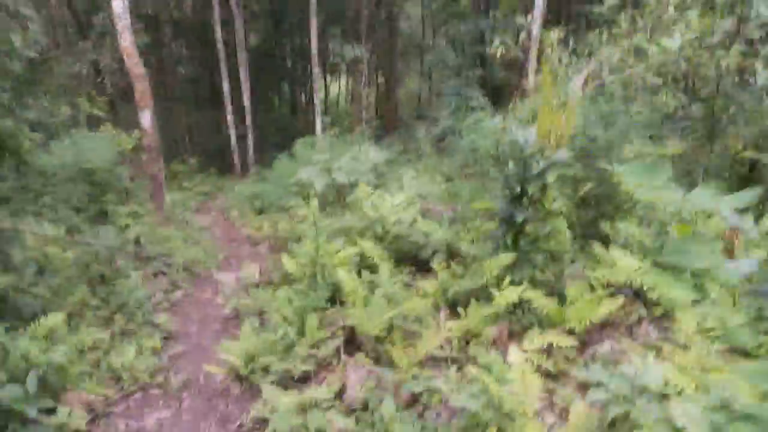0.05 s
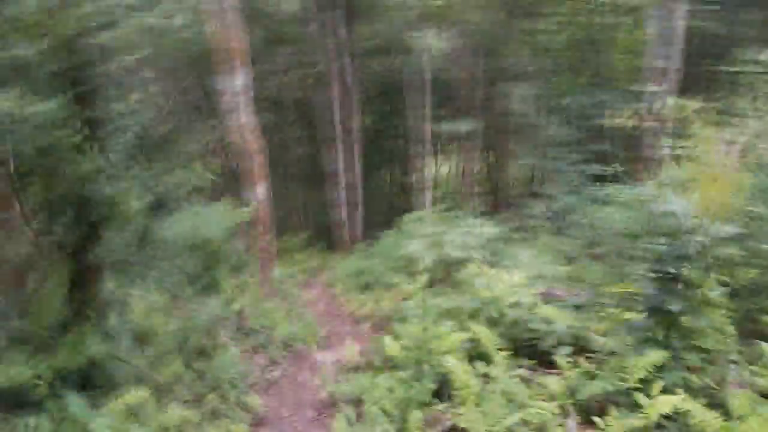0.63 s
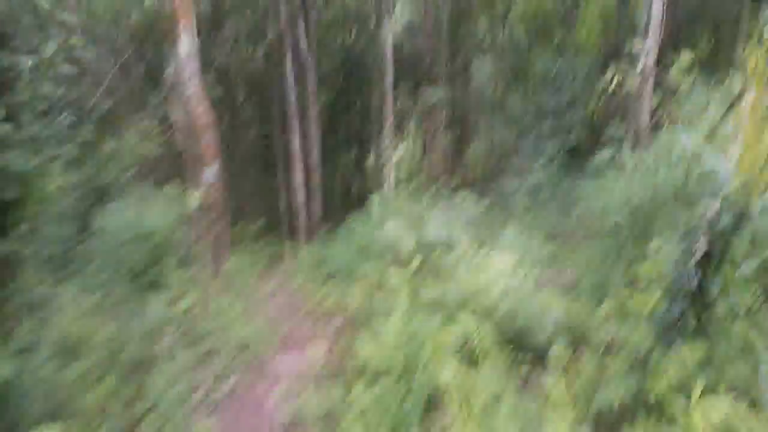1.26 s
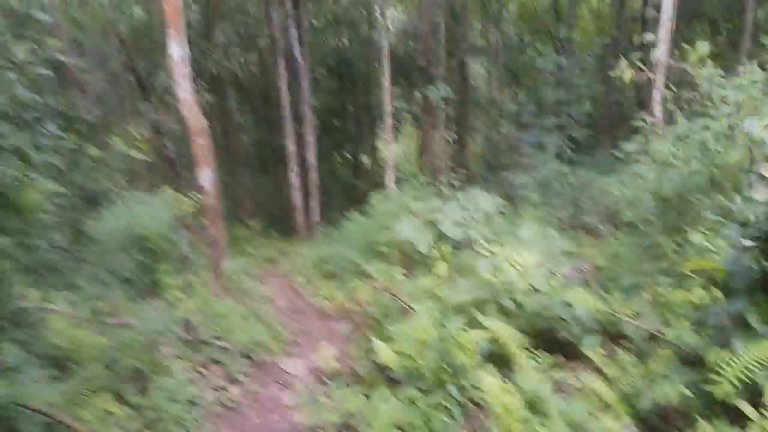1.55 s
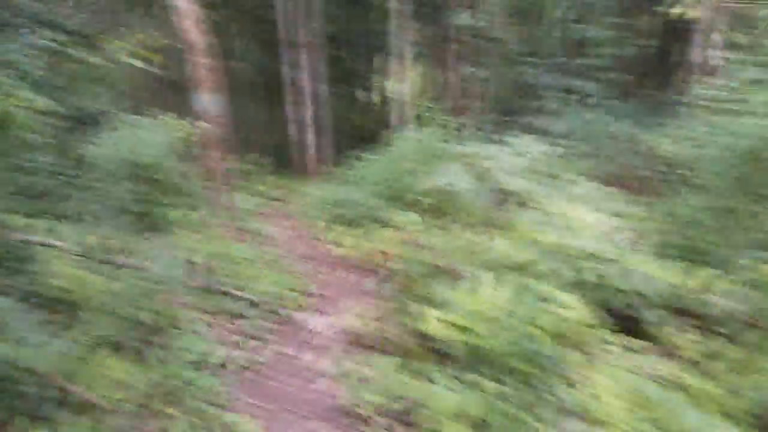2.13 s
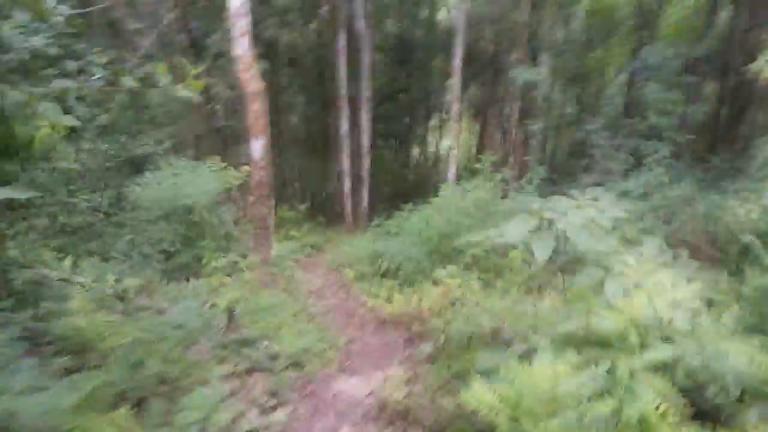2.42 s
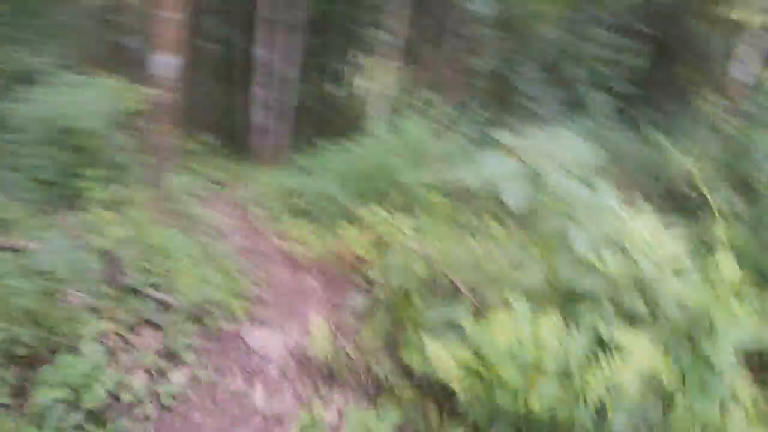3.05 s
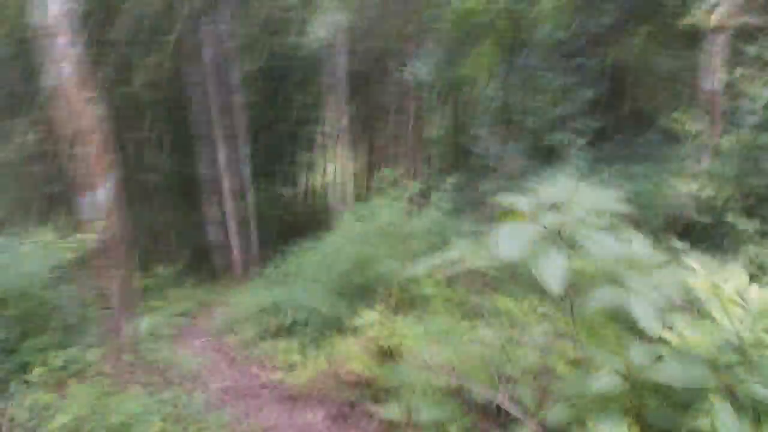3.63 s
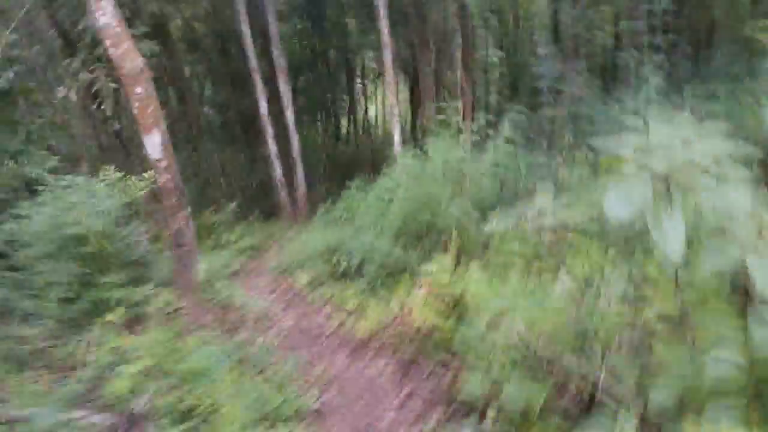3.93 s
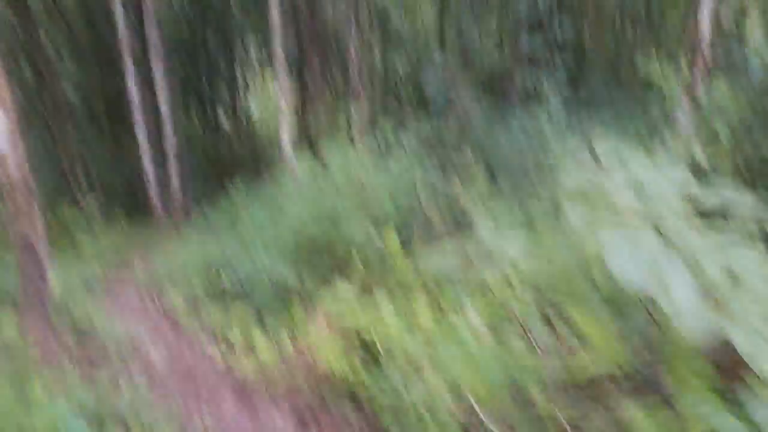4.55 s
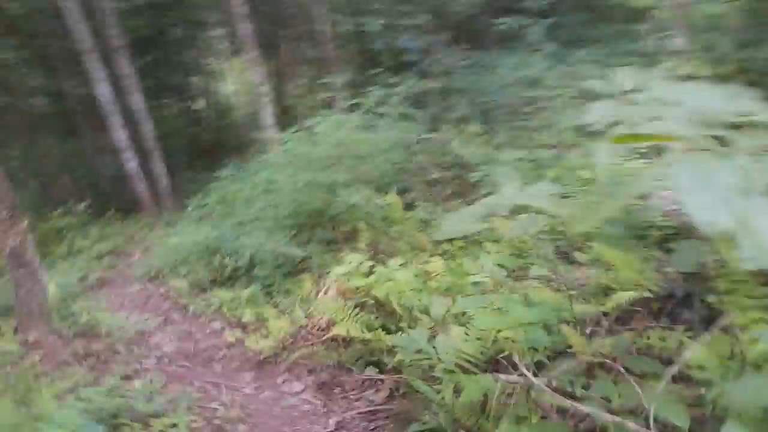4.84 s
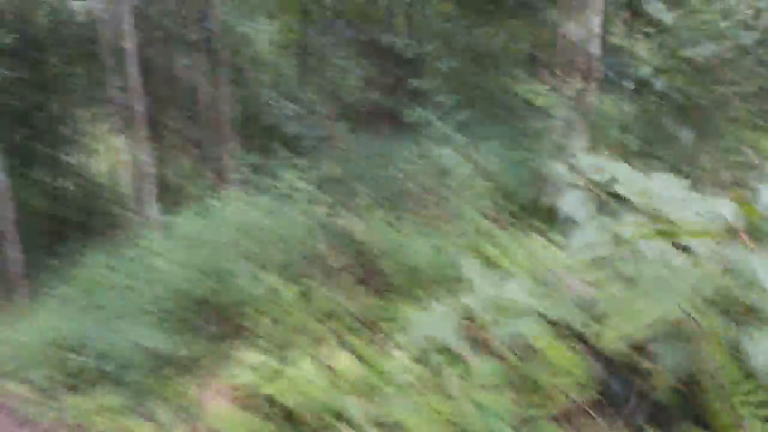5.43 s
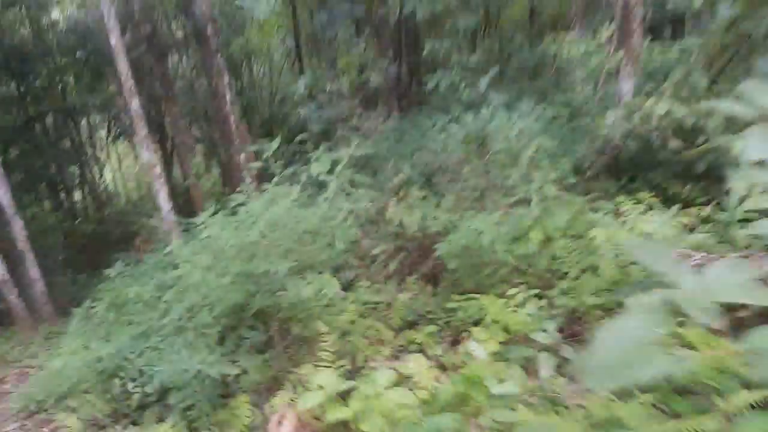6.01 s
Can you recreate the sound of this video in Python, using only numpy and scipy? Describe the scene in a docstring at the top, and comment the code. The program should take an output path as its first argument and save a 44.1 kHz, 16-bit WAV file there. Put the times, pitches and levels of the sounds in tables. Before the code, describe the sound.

Someone walks briskly along a dirt path in a forest, carrying the microphone. Shoes thud and scuff about twice a second, crunching dry leaves and twigs, while loose gear knocks and ferns and nylon clothing swish. Low puffs of wind buffet the right side of the microphone, strongest in the first half. Behind the steps, insects shrill faintly on one high pulsing note over the quiet hush of the trees.

```python
"""A dirt path through forest undergrowth, where someone walks briskly, carrying the microphone.
Shoes thud and loose gear knocks as damped resonators; dry litter crunches by brittle fracture.
Ferns and nylon clothing swish by friction, and each stride drives turbulent air over the right port.
Insects shrill on one pulsing note above the hush of the trees. Faint hollow tones swell and fade."""
import sys
import numpy as np
from scipy import signal
from scipy.fft import rfft, irfft, next_fast_len
from scipy.io import wavfile

SR = 44100
rng = np.random.default_rng(int(sys.argv[2]) if len(sys.argv) > 2 else 0)


def generate_wav(sig):
    """Save sig (samples, or channels by samples) to the path in sys.argv[1] as 16-bit PCM at SR."""
    pcm = np.round(np.clip(np.atleast_2d(sig).T, -1, 1) * 32767).astype(np.int16)
    wavfile.write(sys.argv[1], SR, pcm)


N = 276771
TIME = np.arange(N) / SR
FFT_SIZE = next_fast_len(N, True)
HZ = np.maximum(np.arange(FFT_SIZE // 2 + 1) * SR / FFT_SIZE, 1)
SIDES = np.array([[1], [-1]])   # left, right


def from_db(db):
    """Amplitude ratio of a level in decibels."""
    return 10 ** (np.asarray(db) / 20)


def unit_rms(x):
    """Normalisation to a mean power of 1."""
    return x / np.sqrt(np.mean(x ** 2) + 1e-20)


def at_hz(rows, hz):
    """Interpolation of each column of a spectrum along a logarithmic frequency axis."""
    points, *columns = np.transpose(rows)
    return [np.interp(np.log(hz), np.log(points), column) for column in columns]


def add(out, start_s, sound):
    """Superposition of a short sound on a longer one."""
    start = max(round(start_s * SR), 0)
    out[..., start:start + sound.shape[-1]] += sound[..., :max(N - start, 0)]


def drift(per_s):
    """Random modulation, gliding to a new value per_s times a second; rms 1."""
    return unit_rms(np.interp(TIME * per_s, np.arange(N // 8), rng.standard_normal(N // 8)))


def phrase(start_s, end_s, fade_s=0.025):
    """Amplitude envelope with a smooth onset and release."""
    return (np.tanh((TIME - start_s) / fade_s) - np.tanh((TIME - end_s) / fade_s)) / 2


def band(spectra, low_hz, high_hz):
    """Band-pass filtering of two spectra into a stereo signal; rms 1."""
    gain = 1 / np.sqrt((1 + (low_hz / HZ) ** 10) * (1 + (HZ / high_hz) ** 10))
    return unit_rms(irfft(spectra * gain, FFT_SIZE)[:, :N])


def narrow_noise(hz, width_hz):
    """Random quadrature modulation spreads a tone into a narrow band; rms 1."""
    position = np.arange(len(hz)) * width_hz / SR
    knots = rng.standard_normal((2, N // 8))
    in_phase, quadrature = [np.interp(position, np.arange(N // 8), row) for row in knots]
    phase = 2 * np.pi * np.cumsum(hz) / SR
    return unit_rms(in_phase * np.cos(phase) + quadrature * np.sin(phase))


def grains(per_s, spread_db, hiss):
    """Shot noise in two rows: many weak snaps and a few strong ones, in a smooth friction hiss."""
    onsets = rng.random(N) < per_s / SR
    sizes = from_db(spread_db * np.minimum(rng.exponential(1, N), 5))
    snaps = unit_rms(onsets * sizes * rng.standard_normal((2, N)))
    return snaps + hiss * rng.standard_normal((2, N))


# The sound field at the two microphone ports: frequency_hz, left_minus_right_db, correlation
PORT_FIELD = [(102, -2, 1), (414, 0, 0.81), (830, -0.5, 0.54), (1350, -3, 0.12), (2300, -7.5, -0.08),
              (5470, -11, -0.083), (7400, -1, 0.41), (12100, -2.5, -0.16), (16000, -3.5, 0.0083)]
def at_ports(pair, colour):
    """Partial coherence: the ports' spectra agree in the bass; the treble differs and leans right."""
    balance_db, correlation = at_hz(PORT_FIELD, HZ)
    correlation = np.clip(correlation, -.98, .98)
    mid, side = rfft(pair, FFT_SIZE)
    spectra = np.sqrt(1 + correlation) * mid + SIDES * np.sqrt(1 - correlation) * side
    mean_power = np.cosh(balance_db * np.log(10) / 20)
    return spectra * from_db(SIDES * balance_db / 2 + at_hz(colour, HZ)[0]) / np.sqrt(mean_power)


# Spectrum of the ambient noise among the trees: frequency_hz, relative_density_db
HUSH_SPECTRUM = [(25, 21.5), (80, 5), (200, -3.5), (400, -5.5), (800, -12), (1130, -12.5), (1260, -7),
                 (1400, -19), (2400, -11.5), (3500, -23), (5000, -16.5), (6300, -45), (9000, -60),
                 (16000, -19)]
def forest_hush(level_db=-60):
    """Stationary coloured noise forms the floor of the scene."""
    return from_db(level_db) * band(at_ports(rng.standard_normal((2, N)), HUSH_SPECTRUM), 46, 17000)


# Faint hollow, breathy tones that swell and fade: start_s, end_s, pitch_hz, level_db
HOLLOW_TONES = [(1.15, 1.4, 1250, -70), (2.15, 2.3, 1260, -67), (3.3, 3.65, 1260, -67.5),
                (1.12, 1.38, 2000, -78), (3.94, 4.6, 2380, -70)]
def hollow_tones(relative_bandwidth=.13):
    """Narrow-band noise is heard as a hollow, breathy pitch."""
    out = np.zeros((2, N))
    for start_s, end_s, pitch_hz, level_db in HOLLOW_TONES:
        tone = np.array([narrow_noise(np.full(N, pitch_hz), relative_bandwidth * pitch_hz) for _ in out])
        out += from_db(level_db) * phrase(start_s, end_s) * tone
    return out


# Phrases of the nearest insect: start_s, end_s, level_db (about which the pulses swing)
INSECT_PHRASES = [(0, 0.456, -60), (.93, 1.39, -64), (1.7, 2.2, -64), (2.42, 2.62, -67), (2.86, 3.05, -62),
                  (3.54, 3.932, -73), (4.24, 4.38, -64.5), (4.846, 5.012, -67), (5.538, 5.622, -63),
                  (5.947, 6.28, -68)]
def insects(pitch_hz=6973, jitter=.016, pulses_per_s=48, throb_db=4, chorus_db=-72.5):
    """Amplitude and frequency modulation roughen one shrill note, shared by near and distant insects."""
    hz = pitch_hz * (1 + jitter * np.array([drift(600), drift(600)]))
    carrier = np.sqrt(2) * np.sin(2 * np.pi * np.cumsum(hz, axis=1) / SR)
    pulse_hz = pulses_per_s * (1 + .25 * drift(20))
    pulses = np.sin(2 * np.pi * np.cumsum(pulse_hz) / SR)
    nearest = sum(from_db(db) * phrase(start_s, end_s) for start_s, end_s, db in INSECT_PHRASES)
    return np.hypot(nearest, from_db(chorus_db)) * from_db(throb_db * pulses) * carrier


# Gusts and lulls of air rumbling over the port: time_s, relative_level_db
GUSTS_AND_LULLS = [(0, -59), (.33, -59), (.62, -45), (.97, -54), (1.08, -73), (1.22, -37), (1.62, -45),
                   (1.85, -48), (2.3, -37), (2.58, -33), (2.72, -56.5), (3.1, -43.5), (3.48, -68.5),
                   (3.7, -46.5), (4.2, -50.5), (4.45, -76), (4.75, -41.5), (5.04, -62), (5.35, -45),
                   (5.54, -60.5), (5.8, -40), (6.28, -50)]
# Spectrum of the turbulence: frequency_hz, relative_density_db
TURBULENCE_SPECTRUM = [(15, 2.5), (30, -15), (50, 2), (70, 2.5), (100, 3.5), (150, -12), (250, -19.5),
                       (500, -66)]
# Single strong eddies at the right port: time_s, envelope_peak_db, pitch_hz
EDDIES = [(0.546, -22, 110), (0.579, -24.5, 100), (.662, -18.5, 108), (.756, -28.5, 86),
          (0.916, -19.5, 100), (0.995, -22, 74), (1.325, -22, 115), (1.358, -19.5, 86.5), (1.395, -17, 169),
          (1.455, -10.5, 121), (1.926, -17, 99), (2.054, -21, 85), (2.105, -22.5, 75), (2.268, -22.5, 129),
          (2.352, -24, 75.5), (2.471, -14.5, 150), (2.527, -19, 78), (2.553, -19, 122), (2.618, -12.5, 145),
          (3.069, -29, 70), (3.703, -27.5, 117), (3.922, -26, 82.5), (4.14, -29, 160), (4.599, -24, 104),
          (4.68, -32, 75), (4.815, -25, 88), (5.345, -26, 138), (5.855, -29, 110), (5.924, -27, 75),
          (6.238, -23.5, 92)]
def port_wind(gain_db=2.5, stride_db=2, lumpy_db=6, eddy_cycles=0.29, shelter_db=-16, leak_db=-34):
    """Turbulent pressure fluctuations buffet the right port; the left one lies sheltered."""
    gust_db = np.interp(TIME, *np.transpose(GUSTS_AND_LULLS)) + gain_db
    envelope = from_db(gust_db + stride_db * stride() + lumpy_db * drift(30))
    spectra = rfft(rng.standard_normal((2, N)), FFT_SIZE) * from_db(at_hz(TURBULENCE_SPECTRUM, HZ)[0])
    left, right = envelope * unit_rms(irfft(spectra, FFT_SIZE)[:, :N])
    t = np.arange(-(SR // 25), SR // 25) / SR
    for time_s, peak_db, pitch_hz in EDDIES:
        cycles = pitch_hz * t - 0.044 * (pitch_hz * t) ** 2   # the eddy slows as it leaves
        puff = from_db(peak_db) * np.exp(-.5 * (pitch_hz * t / eddy_cycles) ** 2)
        add(right, time_s + t[0], puff * np.sin(2 * np.pi * (cycles + rng.random())))
    return np.array([from_db(shelter_db) * left + from_db(leak_db) * right, right])


# Ribbed nylon sliding on itself: start_s, end_s, start_hz, middle_hz, end_hz, level_db, width_hz
NYLON_SLIDES = [(0, 0.146, 10300, 9300, 9100, -65, 200), (0.535, 0.665, 5900, 5680, 5200, -53.5, 650),
                (0.56, 0.87, 5650, 5550, 5450, -61.5, 750), (4.195, 4.305, 10700, 12050, 8300, -59.5, 450),
                (4.13, 4.32, 10900, 11700, 10600, -59.5, 2200),
                (4.285, 4.395, 12700, 11500, 9000, -69, 300), (4.28, 4.37, 11200, 10600, 9400, -69, 300),
                (4.79, 4.98, 11100, 11500, 10700, -63, 3200), (5.455, 5.61, 9900, 10950, 10050, -66, 220),
                (5.68, 5.79, 10200, 10700, 9100, -65, 400), (5.63, 5.81, 11800, 13300, 10200, -74.5, 700),
                (5.92, 6.19, 11200, 11900, 10900, -54.5, 3000)]
def nylon_zips():
    """Periodic contact: ribs pass each other unevenly, at a rate that glides with the swing of a limb."""
    out = np.zeros((2, N))
    for start_s, end_s, start_hz, middle_hz, end_hz, level_db, width_hz in NYLON_SLIDES:
        progress = np.linspace(0, 1, round((end_s - start_s) * SR))
        glide_hz = np.polyval(np.polyfit([0, .5, 1], [start_hz, middle_hz, end_hz], 2), progress)
        envelope = from_db(level_db) * np.sqrt(2) * np.sin(np.pi * progress)
        add(out, start_s, envelope * np.array([narrow_noise(glide_hz, width_hz) for _ in out]))
    return out


# Spectrum of rubbing and snapping leaves, soil and cloth: frequency_hz, relative_density_db
CONTACT_SPECTRUM = [(150, 2.5), (400, -2), (720, -11.5), (950, -9), (1400, -8), (1750, -8), (2300, -5),
                    (3000, -9), (4800, -10), (6400, -17), (8500, -16), (11000, -12.5), (13000, -14.5),
                    (16000, -12)]
def foliage(dryness_db, patchy_db=3.5, leaf_sizes=7):
    """Spectral tilt: each size of leaf crackles in its own band, and dry leaves favour the high ones."""
    edges_hz = np.geomspace(700, 6500, leaf_sizes + 1)
    crackle, power = 0, 0
    for low, high, tilt in zip(edges_hz, edges_hz[1:], np.linspace(-1.01, 1.01, leaf_sizes)):
        snaps = band(at_ports(grains(per_s=1100, spread_db=2, hiss=0.64), CONTACT_SPECTRUM), low, high)
        density_db = at_hz(CONTACT_SPECTRUM, np.sqrt(low * high))[0] + tilt * dryness_db
        gain = from_db(density_db) * np.sqrt(high - low)
        crackle += gain * from_db(patchy_db * drift(75)) * snaps
        power += gain ** 2
    return crackle / np.sqrt(power)


def stroke_power(t, peak_db, rise_s, fall_s, shape=1.19):
    """Growth and decay of power about a peak at t = 0; shape 1 is pointed, 2 is rounded."""
    distance = np.abs(t / np.where(t < 0, rise_s, fall_s))
    return from_db(peak_db) ** 2 * np.exp(-2 * np.minimum(distance, 20) ** shape)


# Fronds and sleeves sweeping past, in relative levels:
# time_s, rise_s, fall_s, foliage_db, dryness_db, nylon_db
SWEEPS = [(.04, 0.39, 0.41, -52, 2.5, -54.5), (.235, 0.125, 0.084, -39.5, -5, -49),
          (.36, 0.024, 0.15, -47.5, 1.5, -53.5), (0.417, 0.014, 0.037, -39.5, -1.5, -44.5),
          (.67, 0.12, 0.027, -47.5, -5, -53), (1.0, 0.017, 0.03, -54, 3, -54.5),
          (1.17, 0.025, 0.032, -62, -1, -78), (1.33, 0.09, 0.11, -56.5, -8.5, -67),
          (1.55, 0.083, 0.087, -61, 9, -63), (1.81, 0.022, 0.026, -48, 9, -52.5),
          (2.031, 0.0089, 0.095, -51.5, 3, -54), (2.281, 0.029, 0.073, -51.5, -4.5, -58),
          (2.495, 0.048, 0.22, -49.5, -4.5, -58), (2.69, .03, 0.039, -72, 2, -66.5),
          (2.911, 0.015, 0.19, -46, 3.5, -51.5), (3.295, 0.024, 0.04, -44, -1, -59),
          (3.365, 0.051, 0.035, -47.5, 4, -51.5), (3.422, 0.0052, 0.026, -45.5, -3, -67),
          (3.56, 0.036, 0.055, -57.5, 13, -61.5), (4.25, 0.21, 0.085, -54, -0.5, -55.5),
          (4.4, 0.048, 0.031, -50.5, -1.5, -65), (4.725, 0.045, 0.049, -51, 4.5, -54.5),
          (4.85, 0.083, 0.3, -60, -1, -56.5), (5.155, 0.024, 0.078, -51, 8, -53),
          (5.32, 0.057, 0.11, -56, 0.5, -62), (5.47, 0.17, 0.089, -57, 2.5, -68),
          (5.634, 0.077, 0.089, -56.5, 0, -57.5), (5.78, 0.097, 0.038, -62.5, -9, -73.5),
          (6.06, 0.21, 0.081, -54, -0.5, -50.5), (6.22, 0.23, 0.47, -50.5, 3, -51.5)]
# Footfalls, in relative levels: time_s, rise_s, fall_s, scuff_db, foliage_db, dryness_db, nylon_db
FOOTFALLS = [(.55, 0.029, 0.15, -40.5, -47, -4, -53), (.915, 0.056, 0.072, -45, -49, -5.5, -64),
             (1.42, 0.038, 0.12, -46, -47, -4, -52.5), (1.897, 0.053, 0.047, -47.5, -44, 7, -46),
             (2.612, 0.058, 0.044, -39, -48.5, -2, -45), (3.11, 0.05, 0.21, -43, -50, 6, -55.5),
             (3.72, 0.13, 0.12, -49, -48.5, 5, -56.5), (4.095, 0.09, 0.22, -46.5, -55, 1, -56.5),
             (4.58, 0.03, 0.05, -41, -45, 1.5, -51.5), (5.213, 0.029, 0.042, -74, -47.5, 9, -50),
             (5.88, 0.023, 0.066, -37, -40.5, 3.5, -54)]
def stroke_levels(sweep_rub_db=0.5, rub_limit_db=-50):
    """Incoherent sources add in power: all strokes sum to scuff, foliage, dryness and nylon curves (dB)."""
    sweeps = [(time_s, rise_s, fall_s, min(leaf_db + sweep_rub_db, rub_limit_db), leaf_db, *rest)
              for time_s, rise_s, fall_s, leaf_db, *rest in SWEEPS]
    scuff, leaves, nylon = from_db([-64, -73, -80]) ** 2   # clothes never quite stop moving
    dryness, coarse_time = 0, TIME[::40]
    for time_s, rise_s, fall_s, scuff_db, leaf_db, dryness_db, nylon_db in list(FOOTFALLS) + sweeps:
        t = coarse_time - time_s
        touched = stroke_power(t, leaf_db, rise_s, fall_s)
        leaves += touched
        dryness += touched * dryness_db
        scuff += stroke_power(t, scuff_db, 1.25 * rise_s, 0.74 * fall_s)   # starts before the leaves
        nylon += stroke_power(t, nylon_db, 0.9 * rise_s, 1.07 * fall_s)   # keeps sliding after them
    curves = 10 * np.log10(scuff), 10 * np.log10(leaves), dryness / leaves, 10 * np.log10(nylon)
    return [np.interp(TIME, coarse_time, curve) for curve in curves]


def stride(lag_cycles=0.038):
    """The walker's bob is a quasi-periodic oscillation: 1 just after each footfall, -1 between two."""
    times = np.array(FOOTFALLS)[:, 0]
    period_s = np.diff(times).mean()
    times = np.r_[times[0] - period_s, times, times[-1] + period_s]
    cycles = np.interp(TIME, times, np.arange(len(times)))
    return np.cos(2 * np.pi * (cycles - lag_cycles))


def brushing(lumpy_db=4.5, flutter_db=1.13, tick_db=-13, flicks_per_s=28, flick_decay_s=0.0035):
    """Stick-slip friction: soles scuff the soil, leaves catch and slip, and nylon hisses above them."""
    scuff_db, leaf_db, dryness_db, nylon_db = stroke_levels()
    friction = at_ports(grains(per_s=3000, spread_db=2, hiss=1.07), CONTACT_SPECTRUM)
    catching_db = flutter_db * drift(170)
    scuff = from_db(scuff_db - 0.5 + lumpy_db * drift(90)) * band(friction, 106, 865)
    leaves = from_db(leaf_db - 0.5 + catching_db) * foliage(dryness_db)
    nylon = from_db(nylon_db - 1.06 + 0.99 * catching_db) * band(friction, 6900, 12700)
    onsets = rng.random(N) < flicks_per_s / SR   # stems flick the cloth at random
    flicks = unit_rms(signal.lfilter([1], [1, -np.exp(-1 / (SR * flick_decay_s))], onsets + 1e-18))
    ticks = from_db((leaf_db + nylon_db) / 2 + tick_db) * flicks * band(friction, 2300, 20000)
    return scuff + leaves + nylon + ticks


# Shoes and loose gear knocking: time_s, peak_db, pitch_hz, t60_s
IMPACTS = [(0.4077, -19.5, 383, 0.0075), (0.4092, -18.5, 1345, 0.022), (0.4098, -17, 1510, 0.013),
           (0.4105, -24.5, 2030, 0.013), (0.533, -24.5, 218, 0.0092), (.9287, -25.5, 520, 0.0052),
           (.929, -15.5, 1360, 0.001), (1.049, -39.5, 388, 0.03), (1.169, -38.5, 260, .025),
           (1.684, -42, 277, .03), (1.77, -35.5, 214, 0.035), (1.413, -25.5, 473, 0.0083),
           (1.4374, -28, 438, 0.01), (1.952, -27, 700, 0.0049), (2.2821, -22, 297, 0.011),
           (2.283, -29.5, 780, 0.033), (2.4795, -26.5, 337, 0.018), (2.5775, -16.5, 293, 0.015),
           (2.6009, -24, 332, 0.02), (2.969, -31, 343, 0.03), (3.044, -30.5, 274, 0.028),
           (3.071, -30.5, 440, 0.027), (3.0774, -26, 1410, 0.0069), (3.11, -30, 620, 0.0095),
           (3.1106, -26.5, 1220, 0.0099), (3.279, -32.5, 257, 0.021), (3.42, -22.5, 313, 0.019),
           (3.752, -23.5, 1290, 0.013), (4.027, -40, 409, 0.022), (4.069, -32, 390, 0.014),
           (4.085, -33.5, 378, 0.01), (4.179, -20.5, 734, 0.005), (4.21, -31, 500, 0.0041),
           (4.52, -35, 324, 0.01), (4.563, -27, 353, 0.017), (4.5888, -27.5, 313, 0.0076),
           (5.2544, -32.5, 290, 0.024), (5.2545, -27, 1480, 0.0023), (5.818, -39, 328, .025),
           (5.852, -32, 232, .025)]
def knocks(contact_cycles=0.27, rattle=0.21):
    """Damped free vibration: a soft contact sets a body ringing briefly and a little unevenly."""
    out, t = np.zeros((2, N)), np.arange(SR // 12) / SR
    for time_s, peak_db, pitch_hz, t60_s in IMPACTS:
        around_pitch = signal.butter(2, [pitch_hz / 2, pitch_hz * 2], "band", fs=SR, output="sos")
        noise = unit_rms(signal.sosfilt(around_pitch, rng.standard_normal(len(t))))
        envelope = (1 - np.exp(-t * pitch_hz / contact_cycles)) * from_db(-60 * t / t60_s)
        ring = envelope * (np.sin(2 * np.pi * pitch_hz * t) + rattle * noise)
        balance_db = at_hz(PORT_FIELD, pitch_hz)[0]
        add(out, time_s, from_db(peak_db + SIDES * balance_db / 2) * ring / np.abs(ring).max())
    return out


# Limits of the earth, twig, leaf and crisp bands: edge_hz
LITTER_EDGES = [150, 700, 2500, 7000, 17000]
# Dry litter and stems giving way: time_s, width_s, level_db, centre_hz, spread_octaves
FRACTURES = [(0.2075, 0.0089, -37, 1390, 0.37), (0.273, 0.019, -41, 6000, 1.4),
             (0.528, 0.0028, -31, 5000, 1.3), (0.536, 0.0027, -37.5, 3500, 1.5),
             (0.903, .0008, -34.5, 350, 1.9), (0.9433, 0.0011, -31.5, 3500, 3.9),
             (1.3493, 0.00057, -31, 230, 1.24), (1.401, 0.0033, -35.5, 1200, 1.6),
             (1.4147, 0.00054, -26.5, 1600, 1.4), (1.4387, 0.00064, -24, 8000, 4.1),
             (1.489, .0004, -51, 11000, 1.2), (1.782, 0.002, -42.5, 5000, 0.67),
             (1.9293, 0.0002, -25, 1080, 1.1), (1.9374, 0.0005, -34, 1290, 0.96),
             (1.954, 0.0015, -32, 450, 2.1), (2.0092, 0.00064, -33.5, 7500, 0.92),
             (2.5706, 0.0011, -35, 2200, 1.2), (2.604, 0.0014, -28.5, 420, 1.4),
             (2.914, 0.002, -31.5, 4700, 0.47), (2.9235, 0.00054, -38, 4500, 0.51),
             (2.94, 0.0046, -39, 4000, 0.37), (2.9693, 0.0011, -31, 450, 1.8),
             (3.016, 0.00064, -34, 4000, 0.46), (3.024, 0.00048, -32.5, 2900, .6),
             (3.081, 0.0012, -32, 250, 1.1), (3.1103, .0003, -27, 1990, 0.71),
             (3.112, 0.0022, -31.5, 1300, 0.86), (3.1574, 0.00038, -27, 2400, 1.2),
             (3.294, 0.00042, -38.5, 3000, 0.79), (3.406, .0016, -36, 10000, 0.52),
             (3.6804, 0.0022, -35, 900, 2.5), (3.7007, 0.0055, -38, 3040, 0.97),
             (3.7535, 0.001, -29, 2500, 1.4), (3.8127, 0.00045, -33, 2000, 0.58),
             (3.935, 0.00011, -34.5, 1510, 1.4), (4.085, 0.0083, -41, 500, 2.3),
             (4.566, 0.0014, -31.5, 2370, 0.91), (4.781, 0.00035, -41, 9000, 1.6),
             (4.823, .0004, -39.5, 13000, 0.99), (5.1183, 0.0023, -46, 9000, 1.03),
             (5.19, 0.0073, -43.5, 4200, .5), (5.2003, 0.00056, -31.5, 6000, 0.77),
             (5.229, 0.0008, -37, 9000, 1.8), (5.2564, 0.00036, -31, 800, 5.4),
             (5.874, 0.00066, -28, 4000, 2.1), (5.8838, 0.0022, -28.5, 1410, 1.1),
             (5.925, 0.00029, -36.5, 4500, 1), (6.075, 0.012, -42.5, 4170, 0.75),
             (6.157, 0.00054, -33.5, 3200, 0.6), (6.165, 0.013, -42, 3080, 0.63),
             (6.2256, 0.0033, -35.5, 7550, 0.57)]
def crunches(crumbs_db=-17, settle_s=0.013, splinter_db=-26, lead_s=.04):
    """Brittle fracture: each crunch is a dense burst of snaps, followed by settling crumbs."""
    t = np.arange(SR // 8) / SR - lead_s
    lows, highs = LITTER_EDGES[:-1], LITTER_EDGES[1:]
    middles_hz = np.sqrt(np.multiply(lows, highs))
    skew = np.where(t < 0, 0.83, 1.32)   # a burst rises faster than it falls
    crumbs = from_db(crumbs_db) ** 2 * (t > 0) * np.exp(-np.abs(t) / settle_s)
    band_power = np.zeros((4, N))
    for time_s, width_s, level_db, centre_hz, spread_octaves in FRACTURES:
        shares = np.exp(-.5 * (np.log2(middles_hz / centre_hz) / spread_octaves) ** 2)
        shares += from_db(splinter_db) ** 2   # splinters reach every band
        shares /= shares.sum()
        burst = np.exp(-.5 * (t / (width_s * skew)) ** 2)
        add(band_power, time_s - lead_s, from_db(level_db) ** 2 * shares[:, None] * (burst + crumbs))
    snaps = at_ports(grains(per_s=18000, spread_db=1.45, hiss=0.29), CONTACT_SPECTRUM)
    return sum(np.sqrt(power) * band(snaps, low, high) for power, low, high in zip(band_power, lows, highs))


def scene():
    """Superposition of the nearby walker, the open forest and the hollow tones."""
    walker = crunches() + knocks() + brushing() + port_wind() + nylon_zips()
    return walker + insects() + forest_hush() + hollow_tones()


def record(dry):
    """Band limiting: an elliptic low-pass filter cuts the top treble steeply."""
    return signal.sosfilt(signal.ellip(10, .1, 70, 15900, fs=SR, output="sos"), dry)


dry = scene()
out = record(dry)
generate_wav(out)
```